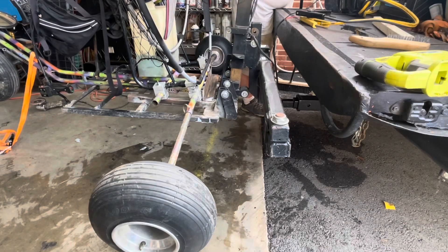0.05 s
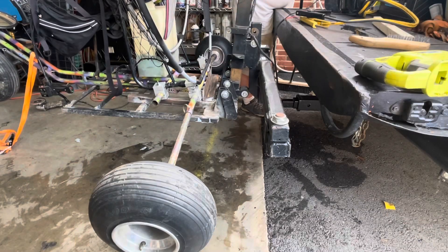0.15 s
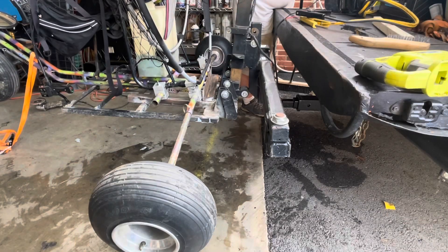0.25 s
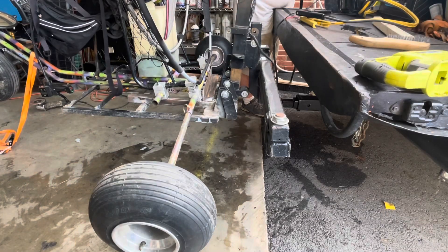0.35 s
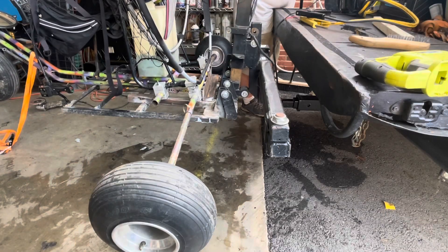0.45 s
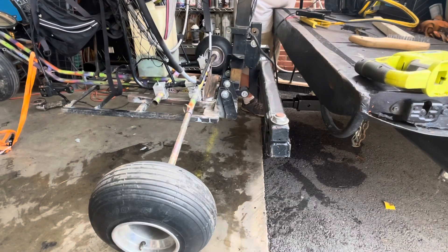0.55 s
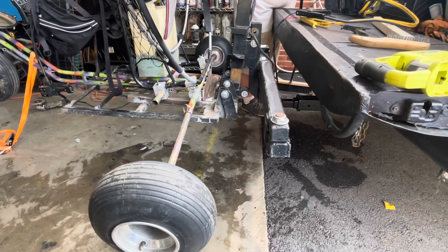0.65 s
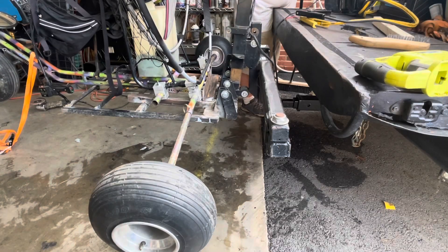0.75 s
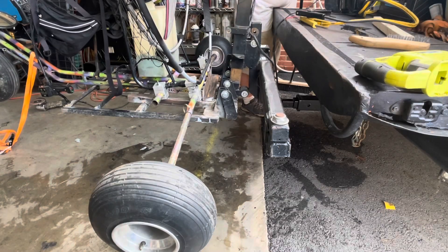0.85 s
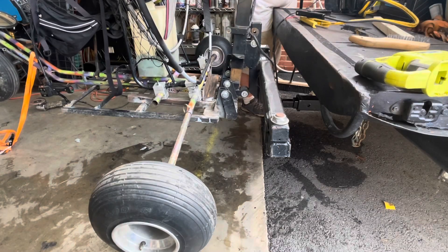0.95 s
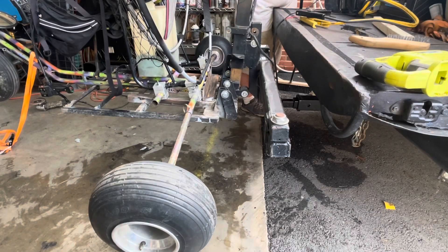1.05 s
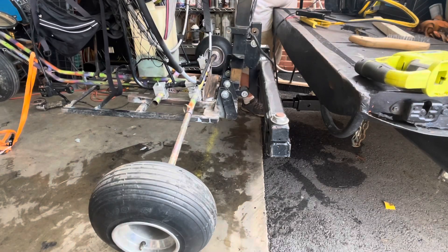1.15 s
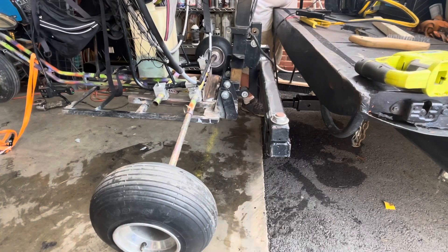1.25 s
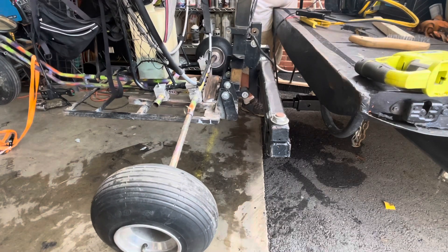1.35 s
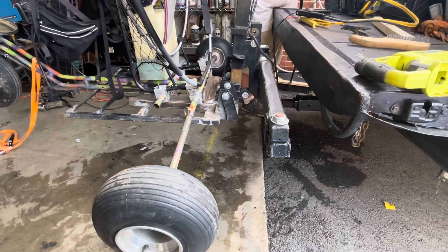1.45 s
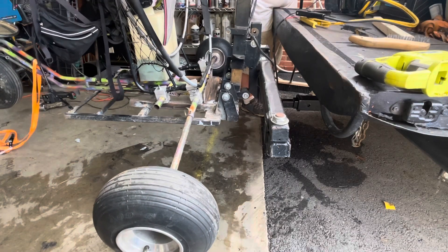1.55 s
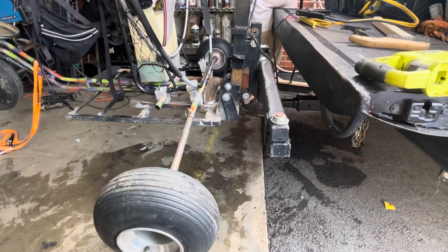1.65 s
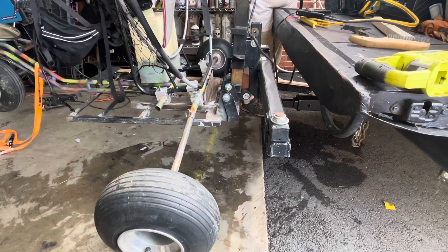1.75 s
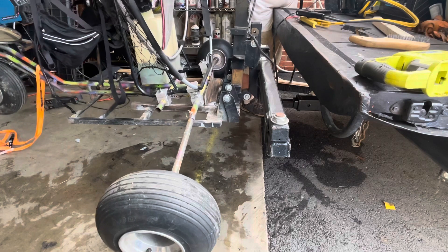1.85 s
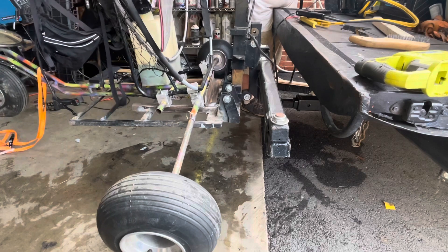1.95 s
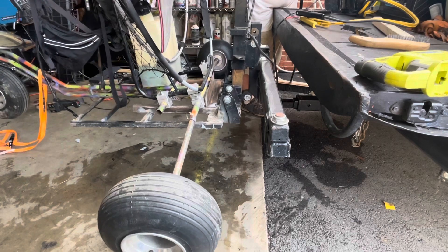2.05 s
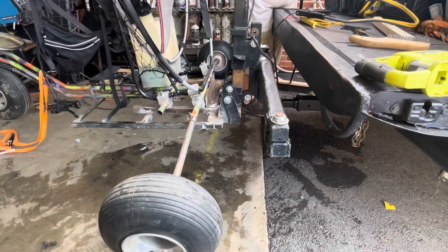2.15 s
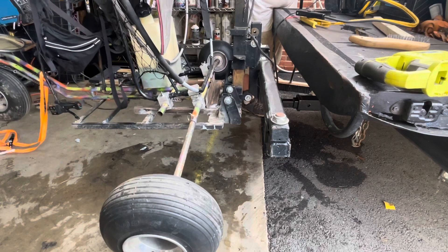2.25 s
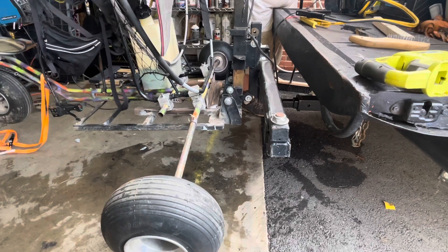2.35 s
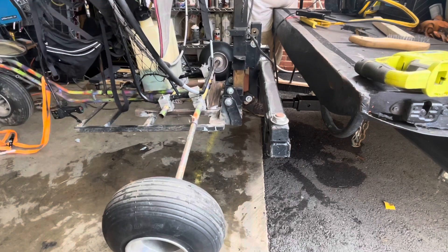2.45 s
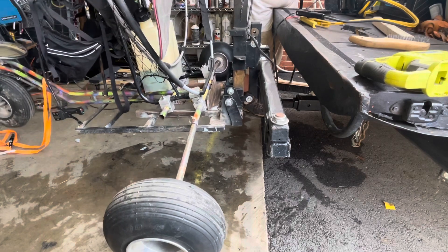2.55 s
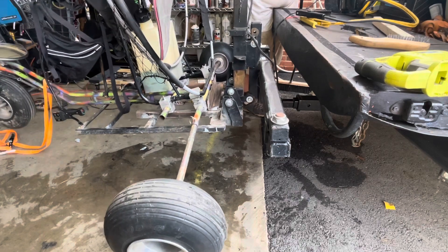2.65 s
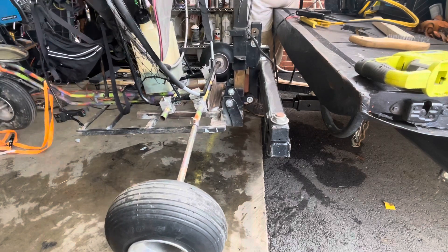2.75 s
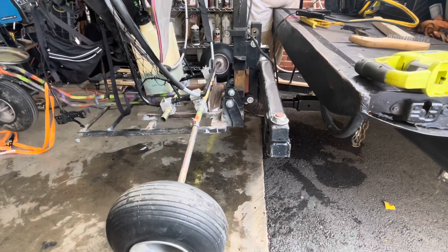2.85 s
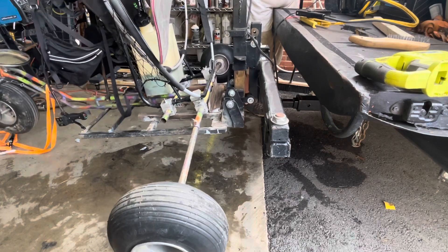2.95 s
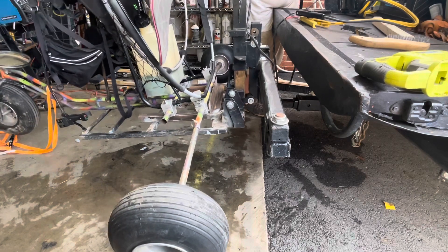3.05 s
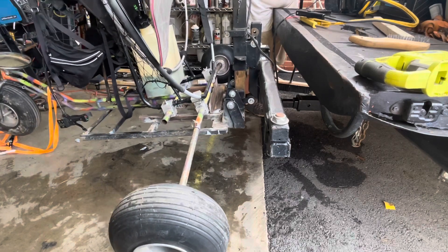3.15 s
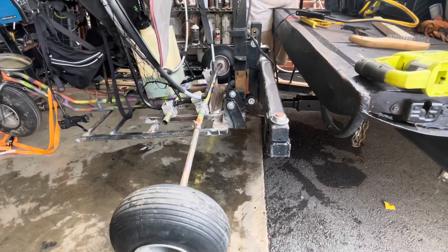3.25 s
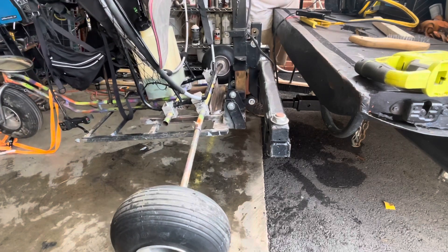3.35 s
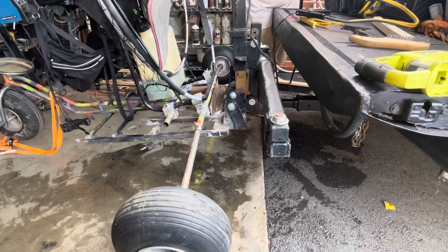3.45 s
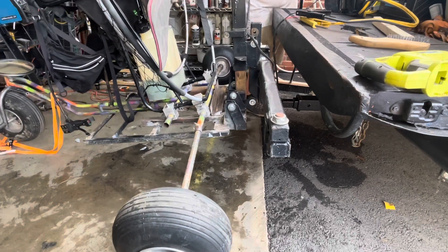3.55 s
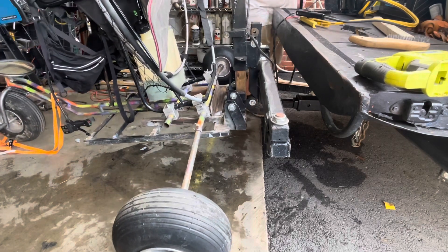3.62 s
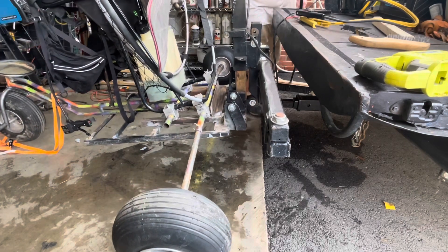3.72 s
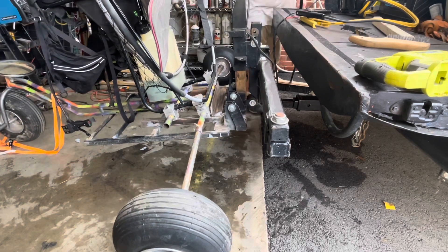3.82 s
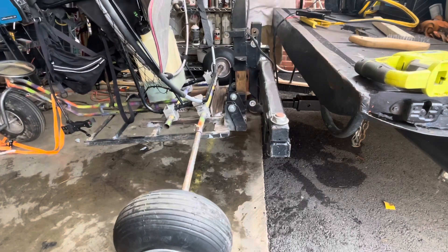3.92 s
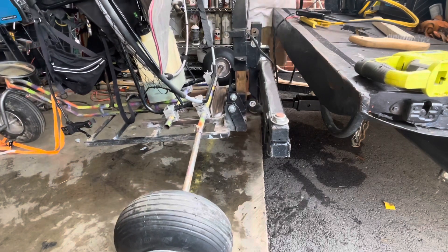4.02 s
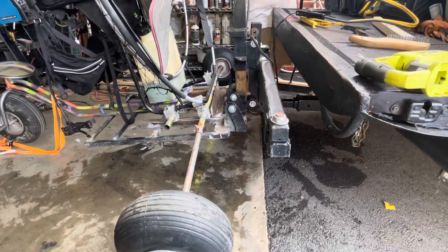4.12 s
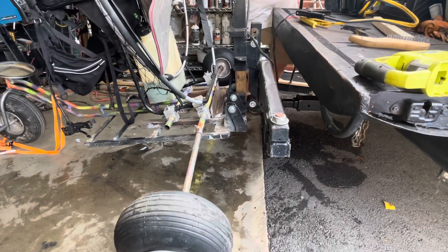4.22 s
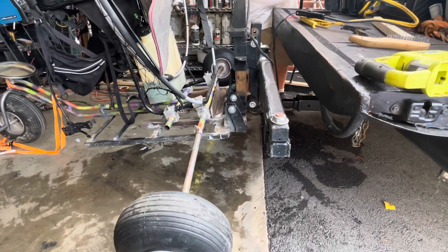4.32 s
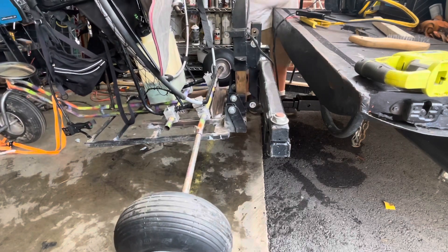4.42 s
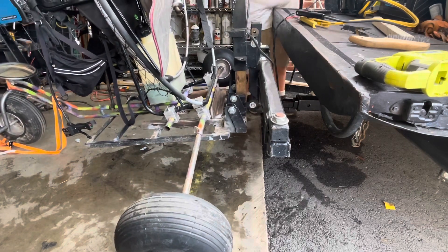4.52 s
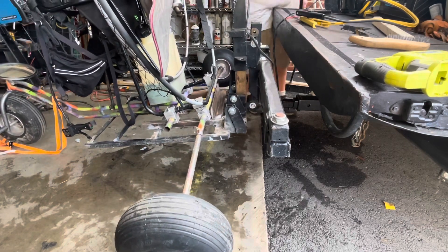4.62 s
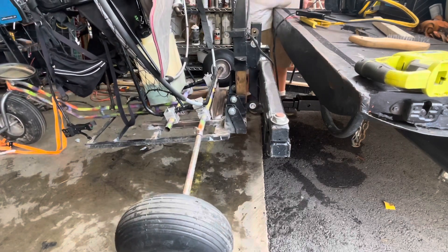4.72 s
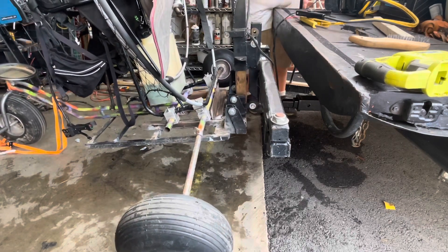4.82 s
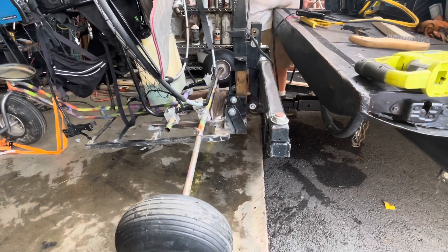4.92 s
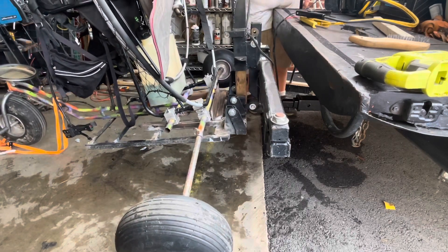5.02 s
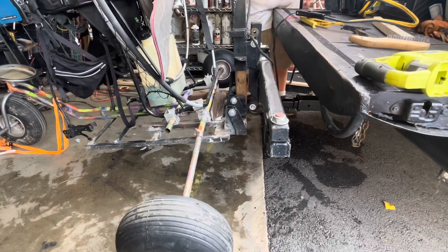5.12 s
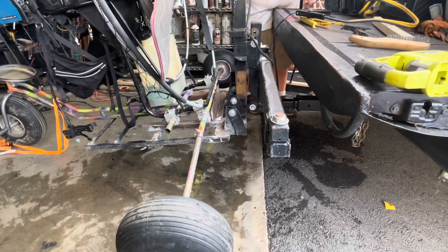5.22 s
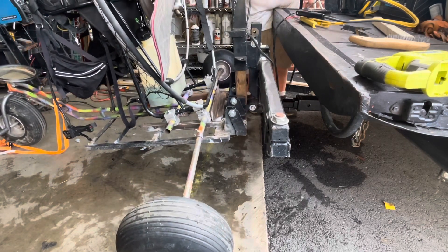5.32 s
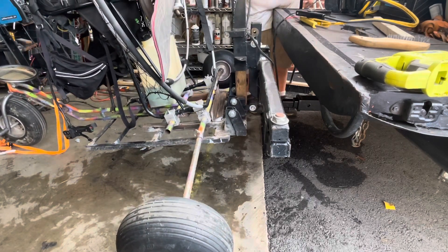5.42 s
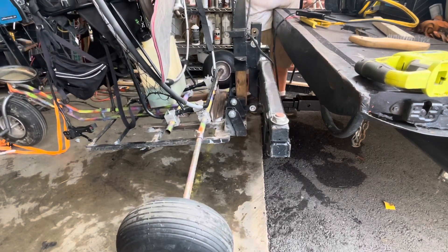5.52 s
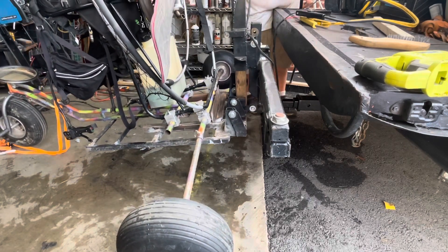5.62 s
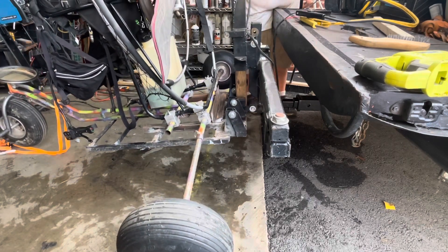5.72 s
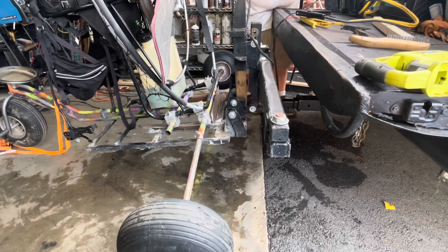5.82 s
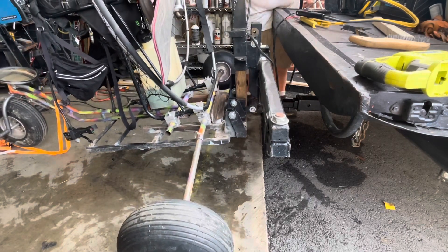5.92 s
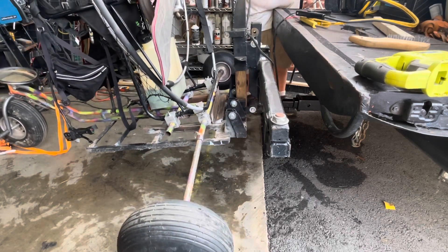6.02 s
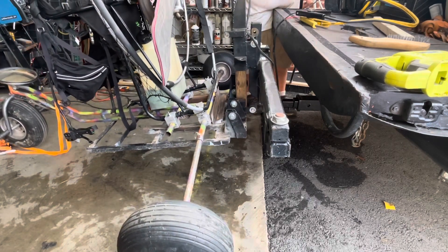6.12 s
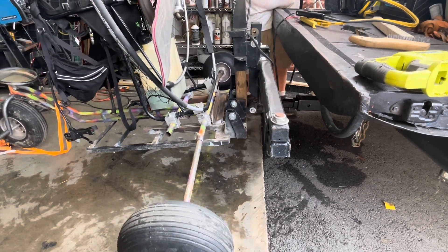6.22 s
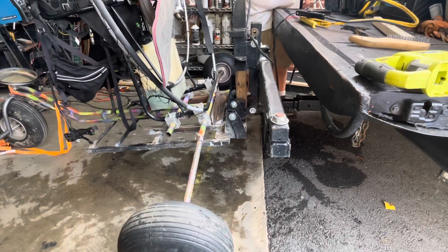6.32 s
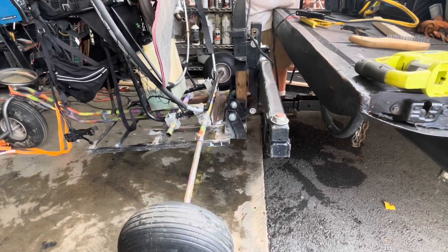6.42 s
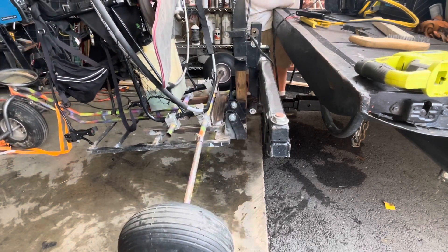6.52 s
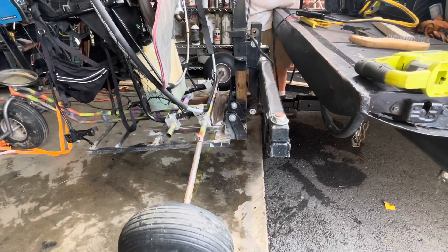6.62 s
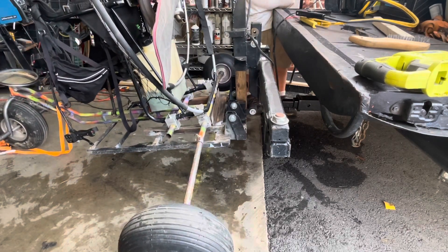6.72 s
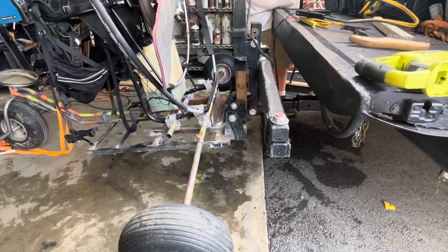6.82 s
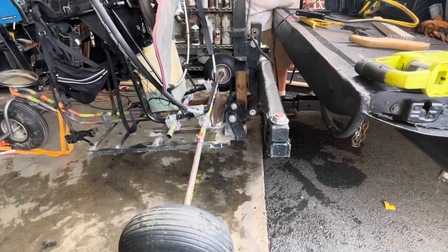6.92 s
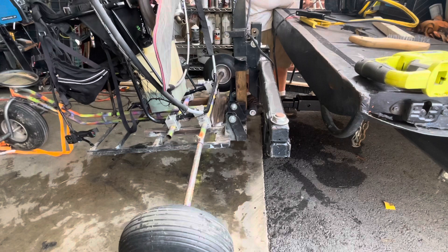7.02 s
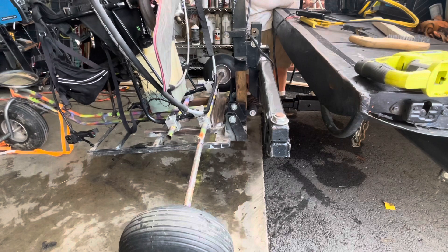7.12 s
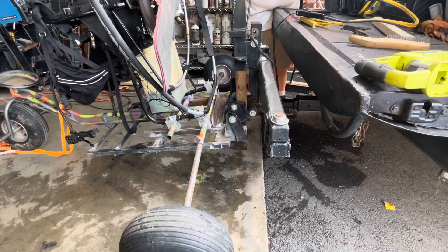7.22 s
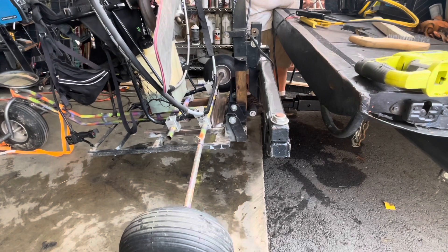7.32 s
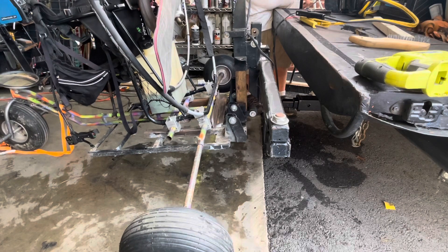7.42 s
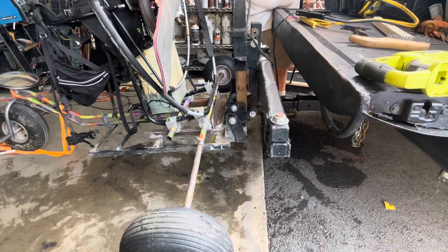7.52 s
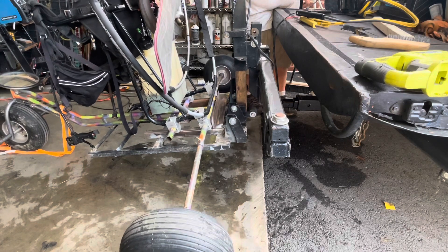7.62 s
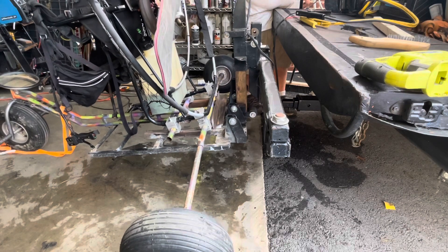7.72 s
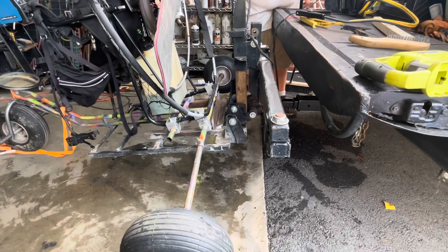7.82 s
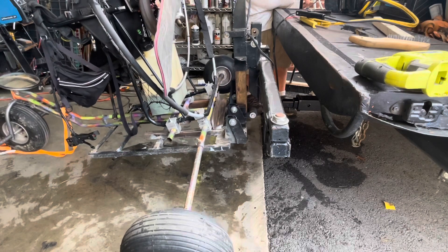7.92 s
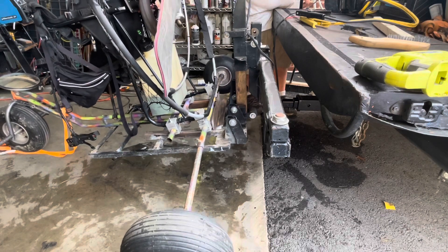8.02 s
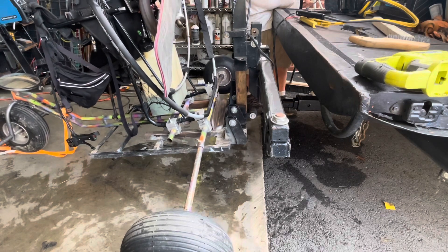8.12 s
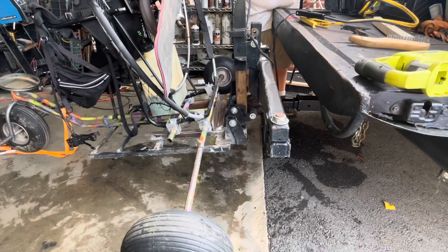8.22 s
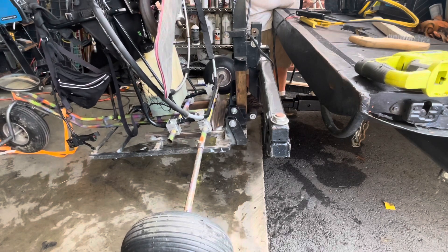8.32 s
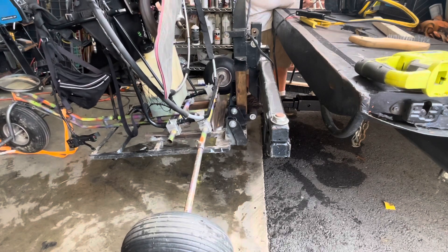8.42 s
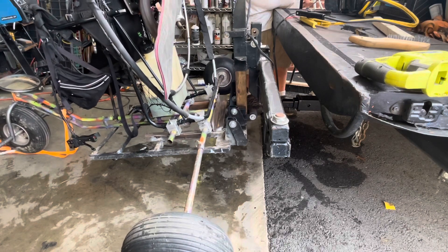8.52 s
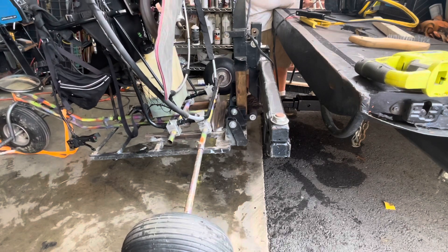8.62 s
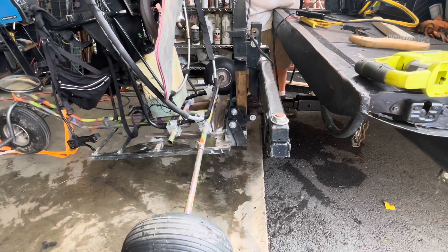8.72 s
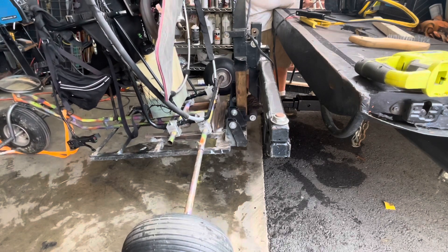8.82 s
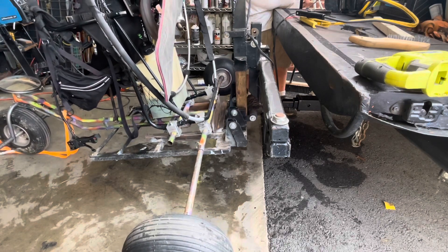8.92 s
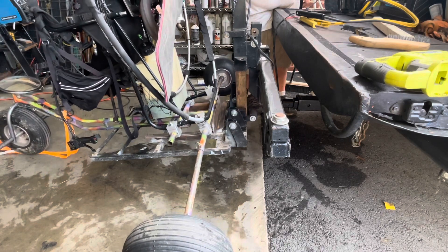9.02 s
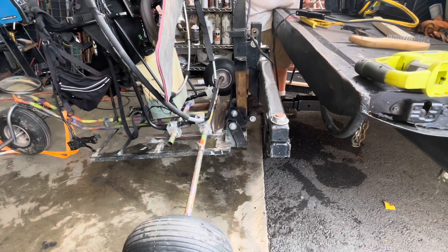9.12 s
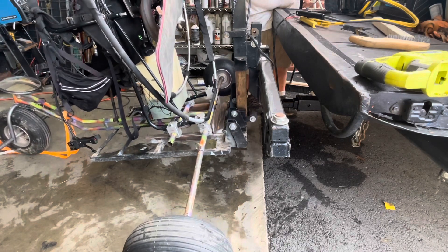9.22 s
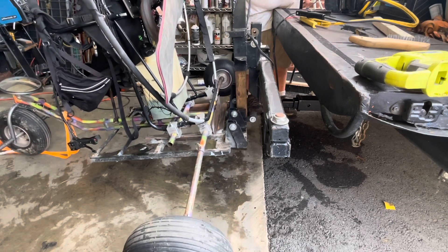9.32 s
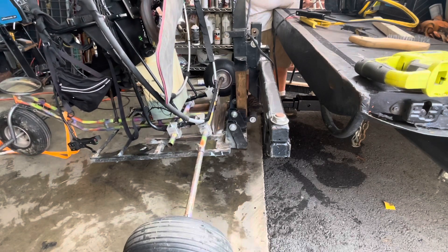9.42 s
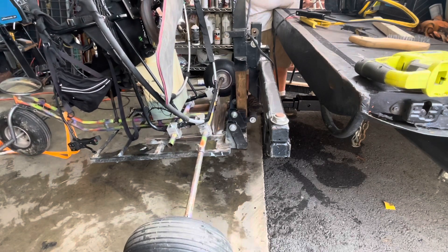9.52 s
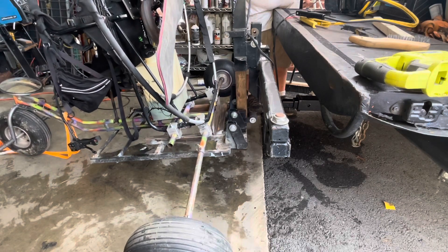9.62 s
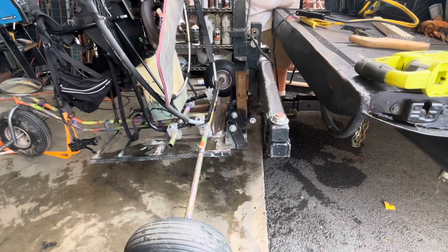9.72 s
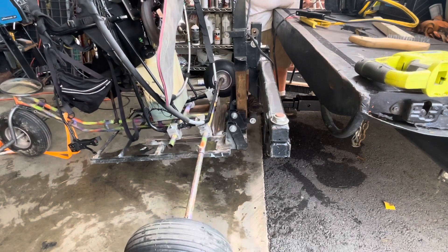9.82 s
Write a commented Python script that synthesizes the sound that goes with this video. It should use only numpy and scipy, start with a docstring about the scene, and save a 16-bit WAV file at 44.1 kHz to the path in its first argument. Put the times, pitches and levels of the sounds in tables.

```python
"""Garage air, narrow hums and an insect sound throughout as shaped noise; a rustle and a switch tick come first.
At 1.09 s a small geared electric motor starts with a clunk and clatter and whines on as it lowers a steel lift:
two strong tones of its 16 commutator bars and many weaker shaft orders are cosines of the shaft angle, over
brush hiss coloured by the housing. Struck modes make the clunk and, from 3.6 s, the frame's two quick judders;
from 4.5 s a single climbing tone is a distant engine."""
import sys
import numpy as np
from scipy import signal
from scipy.fft import rfft, irfft, next_fast_len
from scipy.io import wavfile

SR = 44100
rng = np.random.default_rng(int(sys.argv[2]) if len(sys.argv) > 2 else 0)


def to_wav(s):
    """Save 16-bit WAV."""
    ch = np.atleast_2d(s).T  # columns
    pcm = np.round(np.clip(ch, -1, 1) * 32767)  # PCM
    wavfile.write(sys.argv[1], SR, pcm.astype(np.int16))


N = 434826
T = np.arange(N) / SR
SLOW_T = np.arange(N // 441 + 2) / 100  # s, grid for slow changes
SIZE = next_fast_len(N + SR)
HZ = np.fft.rfftfreq(SIZE, 1 / SR)
START = 1.091  # s, the current comes on


def gain_of(db):
    """Decibel law: 20 dB is a factor of ten in amplitude."""
    return 10 ** (np.asarray(db) / 20)


def evened(x):
    """Normalization to unit rms."""
    return x / np.sqrt(np.mean(x ** 2) + 1e-20)


def read(points, hz):
    """Linear interpolation over logarithmic frequency."""
    f, value = np.transpose(points)
    return np.interp(np.log(hz + 1), np.log(f + 1), value)


def curve(rows, column=1):
    """Linear interpolation of one table column over time; the end values hold."""
    return np.interp(T, [r[0] for r in rows], [r[column] for r in rows])


def drift(rate, count):
    """Low-pass filtered chance: slow random rows of rms 1 on the slow grid, cut off at rate in Hz."""
    chance = rng.standard_normal((count, len(SLOW_T)))
    b, a = signal.butter(2, rate / 50)
    return evened(signal.lfilter(b, a, chance))


def peak(hz, width):
    """Resonance: a magnitude peak of 1, width in Hz between its half-amplitude points."""
    return 1 / (1 + (2 * (HZ - hz) / width) ** 2)


def stereo(x, other, colour, alike, tilt_db, lead=0):
    """Partial coherence: the right is a lagged mix of the left and an unrelated reflected part, then coloured."""
    left, unrelated = rfft(x, SIZE), rfft(other, SIZE)
    right = alike * left + np.sqrt(1 - alike ** 2) * unrelated
    right = right * np.exp(-1j * lead)
    tilt = gain_of(tilt_db / 2)
    return irfft(colour * np.array([left * tilt, right / tilt]), SIZE)[:, :N]


def ringing(modes):
    """Modal superposition: a struck body answers with a sum of exponentially decaying sines."""
    t = T[:SR // 2]
    return sum(gain_of(db - 60 * t / t60) * np.sin(2 * np.pi * hz * t) for hz, db, t60 in modes)


# Colour of the garage air. Each row: frequency in Hz, relative spectral level in dB per Hz.
AIR_COLOUR = [(15, -70), (34, -42), (44, -22), (59, 2), (88, -11.5), (109, -7), (158, -8.5), (237, -13),
              (293, -12.5), (344, -14), (427, -17.5), (978, -22.5), (5570, -73), (6720, -28), (7680, -47.5),
              (15000, -54)]
# Balance of the background. Each row: frequency in Hz, left minus right in dB.
AIR_TILT = [(60, -6), (130, -8.5), (290, -7.5), (640, 1), (1410, 2), (3100, 0), (6820, 2.5), (15000, 0.0)]
# Coherence of the background. Each row: frequency in Hz, left-right likeness from 0 to 1.
AIR_ALIKE = [(40, 0.99), (150, 0.94), (300, 0.7), (600, 0.032), (3000, 0.11)]
# Narrow bands of hum. Each row: frequency in Hz, width in Hz, level in dB.
HUMS = [(53.9, 1.3, -64), (58.2, 1.8, -63.5), (118.9, 1, -62.5), (193.7, 2.5, -65.5), (242.2, 3.3, -68),
        (339, 2.9, -68)]
# The insect's steady band. One row: frequency in Hz, width in Hz, level in dB.
INSECT = (6860, 100, -74.5)
# A faint rustle. Each row: time in seconds, level in dB.
RUSTLE = [(0, -78), (.2, -81), (.32, -68.5), (.45, -77), (.7, -75), (.8, -87), (1.09, -80)]
AIR_DB = -56.5
SWITCH_AT = 0.172  # s
TICK_TAIL_DB, TICK_TAIL_T60_S = -55.5, 0.21  # the walls return the tick


def air_noise(colour):
    """Diffuse field: noise whose left-right coherence depends on frequency."""
    left, other = rng.standard_normal((2, N))
    return stereo(left, other, colour, read(AIR_ALIKE, HZ), read(AIR_TILT, HZ))


def air_hums_and_insect():
    """Addition of powers: unrelated noise bands sum as squares to one spectrum."""
    power = (gain_of(AIR_DB) * evened(gain_of(read(AIR_COLOUR, HZ)))) ** 2
    for hz, width, db in HUMS + [INSECT]:
        power += (gain_of(db) * evened(peak(hz, width))) ** 2
    return air_noise(np.sqrt(power))


def rustle_and_echo():
    """Reverberant decay: band noise follows the rustle's level plus the tick's exponential tail."""
    band = (HZ > 1200) * (HZ < 9000)
    colour = (peak(2000, 1200) + 0.4 * peak(4500, 1500) + 0.1) * band
    tail = gain_of(TICK_TAIL_DB - 60 * abs(T - SWITCH_AT) / TICK_TAIL_T60_S) * (T > SWITCH_AT)
    return (gain_of(curve(RUSTLE)) + tail) * air_noise(evened(colour))


# A distant engine climbing in pitch.
# Each row: time in seconds, frequency in Hz, peak level in dB before the left-right balance.
ENGINE = [(4.5, 70, -86), (6., 78, -59), (6.6, 84, -64), (7.4, 94, -61), (8.3, 107, -52.5), (9., 112, -54),
          (9.4, 116, -61), (9.86, 126, -56)]


def distant_engine():
    """Frequency modulation: a single tone's phase is the running sum of its climbing frequency."""
    phase = 2 * np.pi * np.cumsum(curve(ENGINE)) / SR
    tone = gain_of(curve(ENGINE, 2)) * np.cos(phase)
    return tone * gain_of([[-3.5], [3.5]])  # stronger on the right


# Modes of the switch. Each row: frequency in Hz, relative level in dB, 60 dB decay time in seconds.
SWITCH_MODES = [(1770, -4, 0.11), (1808, -8, .2), (1870, -11, .06), (1990, -9, 0.06), (2080, -14, .06),
                (1790, -16, 0.45), (1850, -22, .35), (3580, -24, .07), (4150, -23, .07), (4425, -19, .09),
                (4750, -24, .06), (5265, -24, .06), (6600, -22, .03), (11000, -24, .012)]
# Phase of the nearby sources. Each row: frequency in Hz, radians by which the left leads.
LEAD = [(0, -3), (690, 2.5), (1640, 0.5), (3010, 3.5), (3450, 2.0), (4570, 8), (5680, 7.5), (6120, 10.5),
        (7670, 13.5), (8870, 18.5), (9300, 16), (12700, 13), (15700, 5.5)]
SWITCH_DB, SWITCH_RISE_S = -39.5, 0.0008


def switch():
    """Impulse excitation: one small tick rings the switch's modes after a very short rise."""
    tick = gain_of(SWITCH_DB) * ringing(SWITCH_MODES)
    tick *= np.minimum(T[:len(tick)] / SWITCH_RISE_S, 1)
    out = np.zeros(N)
    first = round(SWITCH_AT * SR)
    out[first:first + len(tick)] = tick
    delayed = np.roll(out, 90)  # about 2 ms later
    return stereo(out, delayed, colour=0.96, alike=0.99, tilt_db=-1.0, lead=read(LEAD, HZ))


# Blows as the drive takes up its slack; later the frame knocks.
# Each row: time in seconds, strength of the exciting impulse in dB.
BLOWS = [(1.0922, -40), (1.0939, -34), (1.097, -35), (1.1028, -29.5), (1.108, -36), (1.113, -37),
         (1.134, -34), (1.138, -33), (1.145, -38), (1.151, -38), (1.167, -39), (1.186, -41), (3.604, -47),
         (3.652, -44), (3.765, -45), (3.812, -43)]
# Modes of the steel frame. Each row: frequency in Hz, relative level in dB, 60 dB decay time in seconds.
FRAME_MODES = [(122, -19, 0.06), (400, -20, .07), (590, -19, 0.056), (887, -5, 0.06), (1162, -2, 0.022),
               (1315, -5, 0.049), (1460, -6, 0.058), (1680, -1, 0.042), (1930, 1.5, 0.035),
               (2300, -7, 0.021), (3400, -12, 0.006), (4300, -11, 0.007), (7070, -17, 0.022)]
# The frame judders twice. Each row: start in seconds, length in seconds, relative level in dB.
JUDDERS = [(3.6, 0.11, -2.5), (3.7, .15, 0.5)]
# Balance of the frame and the brushes. Each row: frequency in Hz, left minus right in dB.
TILT = [(60, 4), (92, 5), (140, -9), (210, -5), (330, -5.5), (500, -8.5), (770, 1.5), (1170, 8),
        (1790, -0.5), (2740, -9), (4190, 8), (6410, 0), (9810, 0.5), (15000, 0.5)]
JUDDER_DB, SCRAPE_DB, THUD_DB = -46.5, -46.5, -53  # before the judder's own level
CLATTER_DB, CLATTER_RISE_S, CLATTER_T60_S = -35.5, 0.006, 0.6  # loose parts rattle after the start


def judder_swell():
    """Amplitude envelope: a flattened half sine for each judder."""
    swell = np.zeros(N)
    for start, length, db in JUDDERS:
        progress = np.clip((T - start) / length, 0, 1)
        swell += gain_of(db) * abs(np.sin(np.pi * progress)) ** 0.56
    return swell


def struck_frame(swell, rattles_per_s=600, scatter=0.054, walls_t60_s=0.11, thin_hz=700):
    """Convolution: blows and random rattles excite near-wall echoes and the frame's modes."""
    force = np.zeros((2, N))
    for (start, db), sign in zip(BLOWS, rng.choice([-1., 1.], len(BLOWS))):
        force[:, round(start * SR)] = sign * gain_of(db)
    since = T - START
    clatter = gain_of(CLATTER_DB - 60 * since / CLATTER_T60_S) * np.clip(since / CLATTER_RISE_S, 0, 1)
    rattles = rng.laplace(0, 0.4, N) * (rng.random(N) < rattles_per_s / SR)
    force += (gain_of(JUDDER_DB) * swell + clatter) * rattles
    echoes = scatter * rng.standard_normal((2, 2600)) * gain_of(-60 * T[:2600] / walls_t60_s)
    echoes[:, 0] = 1  # direct sound
    echoed = signal.oaconvolve(force, echoes, axes=1)[:, :N]
    left, other = signal.oaconvolve(echoed, ringing(FRAME_MODES)[None], axes=1)[:, :N]
    high_pass = HZ / np.hypot(HZ, thin_hz)
    return stereo(left, other, high_pass, 0.86, read(TILT, HZ), read(LEAD, HZ))


def scrape_and_thud():
    """Filtered noise: a broad scrape and a low thud."""
    scrape = evened(stereo(*rng.standard_normal((2, N)), peak(600, 4500) * (HZ > 150), 1.0, 0))
    thud = evened(stereo(*rng.standard_normal((2, N)), peak(70, 60), 1.0, -5.0))
    return gain_of(SCRAPE_DB) * scrape + gain_of(THUD_DB) * thud


def frame():
    """Forced response: the struck steel frame, with scrape and thud while it judders."""
    swell = judder_swell()
    return struck_frame(swell) + swell * scrape_and_thud()


# Mean loaded shaft speed, creeping up as the lift travels. Each row: time in seconds, turns per second.
SPEED = [(1.3, 70.96), (1.42, 70.82), (1.52, 70.62), (1.85, 70.24), (2.15, 70.44), (2.38, 70.81),
         (2.58, 70.56), (2.8, 70.92), (3.12, 70.73), (3.27, 70.91), (3.5, 70.93), (3.64, 70.6),
         (3.86, 71.13), (4.15, 70.79), (4.42, 70.95), (4.75, 70.86), (5.1, 70.96), (5.42, 71.04),
         (5.7, 71.05), (6.2, 71.23), (6.55, 71.36), (6.9, 71.18), (7.1, 71.35), (7.2, 71.16), (7.36, 71.49),
         (7.5, 71.29), (7.65, 71.49), (8.0, 71.57), (8.4, 71.66), (9.0, 71.76), (9.4, 71.82), (9.86, 71.88)]
# Speed ripple at 1, 2 and 3 times per gear turn. Each row: depth in turns per second, lag in radians.
RIPPLE = [(0.164, 2.17), (0.131, -2.79), (0.059, 0.01)]
GEAR = 20  # shaft turns per turn of the driven gear
SPIN_UP_S = 0.035  # time constant
JITTER = 0.02  # random unevenness of the speed, turns per s


def shaft():
    """Exponential spin-up: integrated speed gives shaft and gear angle in turns, and share of full speed."""
    rise = 1 - np.exp(-np.maximum(T - START, 0) / SPIN_UP_S)
    gear = np.cumsum(curve(SPEED) * rise) / SR / GEAR
    uneven = JITTER * np.interp(T, SLOW_T, drift(12, count=1)[0])
    for k, (depth, lag) in enumerate(RIPPLE, 1):
        uneven += depth * np.cos(2 * np.pi * k * gear - lag)
    turns = GEAR * gear + np.cumsum(uneven * rise) / SR
    return turns, gear, rise


# Brush hiss. Each row: time in seconds, level in dB.
BRUSH = [(1.1, -33.5), (1.12, -41), (1.17, -38.5), (3.5, -38), (6.5, -38), (9.86, -37.5)]
# Broad colour of the housing. Each row: frequency in Hz, relative spectral level in dB per Hz.
HOUSING = [(200, -19), (600, -17), (900, -12.5), (1200, -16), (1700, -8.5), (2200, -6.5), (2600, -13),
           (2950, -19.5), (3250, -24), (4200, -27), (5500, -20.5), (7300, -20), (9400, -7.5),
           (12000, -22.5), (13500, -22), (15600, -39)]
# Resonances of the housing. Each row: frequency in Hz, width in Hz, relative level in dB.
HOUSING_RINGS = [(3440, 200, -16), (3900, 250, -19), (4540, 260, -18.5), (5200, 280, -20), (5630, 62, -14),
                 (6110, 410, -7.5), (6744, 380, -12.5), (6860, 100, -25), (8010, 320, -11),
                 (8860, 550, -14.5), (9980, 470, -0.5), (11230, 820, -9), (12240, 250, -12),
                 (12830, 350, -14)]
# Coherence of the hiss. Each row: frequency in Hz, left-right likeness from 0 to 1.
BRUSH_ALIKE = [(300, 0.58), (1000, 0.89), (2000, 0.46), (5000, 0.81), (9000, 0.74), (12000, 0.84),
               (14000, 1)]


def brushes(turns, repeat=0.05, per_turn=0.06, per_two=0.13, per_bar=0.35):
    """Friction noise: hiss pulsing with shaft and bars, partly repeating each turn, rings in the housing."""
    pattern = irfft(np.exp(2j * np.pi * rng.random((2, 230))), 8192)  # one turn of fixed roughness
    place = np.arange(8192) / 8192
    repeating = evened(np.array([np.interp(turns % 1, place, p) for p in pattern]))
    angle = 2 * np.pi * turns
    pulse = 1 + per_turn * np.cos(angle) + per_two * np.cos(2 * angle)
    pulse += per_bar * np.cos(16 * angle)  # 16 bars
    chance = evened(pulse * rng.standard_normal((2, N)))
    hiss = np.sqrt(repeat) * repeating + np.sqrt(1 - repeat) * chance
    hiss *= gain_of(curve(BRUSH)) * (T > START)
    power = gain_of(2 * read(HOUSING, HZ))
    for hz, width, db in HOUSING_RINGS:
        power += gain_of(2 * db) * peak(hz, width) ** 2
    colour = evened(np.sqrt(power))
    return stereo(*hiss, colour, read(BRUSH_ALIKE, HZ), read(TILT, HZ), read(LEAD, HZ))


# Weaker tones. Each entry: multiple of the shaft speed.
ORDERS = [4, 6, 8, 12, 14, 18, 19, 20, 21, 23, 24, 26, 28, 29, 30, 31, 33, 34, 36, 48, 49, 50, 55, 63, 64,
          66, 67, 75, 76, 78, 79, 80, 82, 95, 96, 97, 98, 108, 110, 112, 113, 122, 124, 125, 126, 128, 130,
          140, 141, 142, 143, 144, 146, 154, 155, 156, 157, 159, 160, 161, 174, 175, 176, 181]
# Four stages of the travel. Each entry: time in seconds.
STAGES = [2.1, 4.05, 6.35, 8.7]
# One row per order: left and right level in dB at each of the four stages in turn,
# then radians by which the left leads at each stage.
ORDER_LEVEL = [(-78, -60, -65, -61, -65, -63, -71, -65, -0.2, 0.1, -0.2, -1.2),
               (-88, -70, -85, -66, -79, -67, -75, -64, 1.6, 0.4, -0.3, -0.0),
               (-77, -65, -82, -63, -83, -65, -83, -64, 3.0, 2.6, 2.5, 2.6),
               (-61, -59, -57, -59, -59, -62, -57, -62, 2.5, 1.7, 2.1, 2.2),
               (-68, -62, -77, -77, -78, -71, -77, -65, 0.7, 1.4, 1.5, 1.1),
               (-68, -67, -68, -76, -63, -68, -61, -64, 0.3, 0.0, -0.0, 0.3),
               (-65, -64, -65, -63, -62, -59, -64, -63, 1.4, 1.3, 1.2, 2.0),
               (-59, -60, -65, -62, -61, -64, -61, -65, 0.7, 0.9, 0.9, 0.7),
               (-58, -61, -65, -62, -60, -61, -63, -60, 1.5, 0.6, 0.9, 0.9),
               (-63, -64, -63, -60, -65, -62, -62, -62, 1.4, 0.6, 0.8, 0.5),
               (-59, -54, -57, -55, -56, -52, -58, -53, 0.7, 0.4, 0.4, 1.0),
               (-67, -72, -61, -68, -62, -60, -70, -56, -0.3, 1.4, 1.6, 1.7),
               (-56, -52, -57, -58, -57, -57, -50, -56, 1.5, 4.3, 7.0, 7.2),
               (-61, -66, -62, -62, -66, -63, -66, -64, 2.2, 0.2, 0.1, 0.2),
               (-61, -58, -58, -56, -49, -47, -48, -44, 0.8, 0.8, 0.7, 0.6),
               (-59, -62, -62, -61, -61, -59, -51, -51, 0.6, 1.4, 1.7, 1.1),
               (-66, -65, -66, -71, -61, -60, -58, -57, 1.2, 0.3, -0.0, 0.9),
               (-67, -59, -61, -57, -61, -59, -48, -55, 1.5, 1.8, 2.9, 3.0),
               (-67, -69, -71, -76, -64, -62, -56, -56, -3.1, -2.4, -4.7, -4.8),
               (-57, -54, -57, -55, -59, -61, -54, -56, 2.4, 2.2, 2.0, 2.5),
               (-69, -71, -73, -74, -69, -67, -68, -76, 2.0, 2.5, 2.1, 2.5),
               (-67, -69, -65, -65, -62, -69, -66, -67, 2.1, 1.8, 1.0, 0.2),
               (-71, -65, -73, -68, -73, -71, -69, -75, 0.7, -0.8, -2.8, -1.3),
               (-82, -83, -70, -74, -67, -69, -63, -68, 0.3, -2.2, -1.0, -2.3),
               (-60, -59, -58, -60, -61, -62, -57, -59, -0.1, 2.9, 2.7, 1.8),
               (-66, -65, -66, -68, -69, -70, -65, -66, -2.2, 0.8, 0.6, 1.1),
               (-77, -75, -75, -76, -70, -69, -66, -73, -1.5, 0.3, 1.5, 1.9),
               (-72, -86, -73, -78, -66, -75, -64, -74, -2.7, 0.1, -2.3, -2.4),
               (-75, -80, -64, -76, -72, -72, -71, -78, 2.8, 2.7, 3.3, 3.6),
               (-66, -74, -67, -71, -72, -72, -71, -69, 0.2, 1.7, 3.1, 2.7),
               (-60, -77, -64, -67, -61, -69, -62, -70, -2.6, -2.0, -1.4, -4.2),
               (-50, -58, -52, -58, -53, -58, -53, -61, 1.3, 0.9, 1.2, 2.0),
               (-72, -75, -70, -72, -62, -64, -58, -64, -2.5, -3.2, -2.3, -1.8),
               (-62, -61, -64, -63, -64, -63, -71, -76, -0.7, -1.0, -1.2, -0.6),
               (-59, -55, -59, -54, -59, -52, -58, -56, -1.1, -1.4, -0.7, -0.1),
               (-66, -66, -64, -60, -65, -62, -63, -61, -0.3, -0.6, -0.4, -0.5),
               (-71, -69, -65, -63, -68, -67, -64, -63, 0.0, -0.7, -0.1, -0.5),
               (-64, -73, -67, -68, -63, -69, -65, -66, -0.8, -0.5, -0.4, -0.6),
               (-62, -66, -70, -72, -73, -68, -72, -63, -0.5, -0.4, -0.8, 0.4),
               (-59, -54, -58, -57, -55, -53, -57, -56, 2.4, 2.2, 1.8, 0.4),
               (-65, -62, -66, -62, -64, -63, -62, -63, 2.0, 3.6, 1.1, -0.2),
               (-68, -59, -69, -64, -73, -58, -66, -57, -2.1, -2.1, -2.2, -3.0),
               (-75, -62, -65, -56, -63, -56, -66, -54, 0.8, 1.7, -0.0, 1.6),
               (-67, -68, -66, -67, -67, -56, -63, -61, -2.5, -1.6, 0.5, 1.8),
               (-60, -54, -58, -53, -59, -56, -63, -53, -2.4, -0.1, -1.3, -3.7),
               (-49, -51, -53, -50, -53, -50, -56, -49, -2.0, -4.8, -3.6, -3.6),
               (-72, -73, -67, -64, -59, -61, -55, -53, -2.4, -3.4, -3.4, -3.2),
               (-53, -55, -50, -51, -52, -53, -55, -58, 2.2, 2.3, 2.3, 2.4),
               (-52, -53, -52, -54, -53, -55, -53, -56, 2.3, 2.4, 2.3, 2.3),
               (-53, -55, -52, -55, -56, -57, -55, -57, 2.5, 2.4, 2.3, 2.3),
               (-51, -53, -55, -57, -58, -58, -60, -61, 2.4, 2.4, 2.3, 2.5),
               (-44, -46, -54, -56, -53, -54, -53, -54, 2.4, 2.4, 2.4, 2.3),
               (-70, -72, -62, -62, -62, -63, -60, -62, 2.7, 2.5, 2.5, 2.3),
               (-63, -62, -60, -60, -61, -62, -65, -66, 2.5, 2.1, 2.0, 1.9),
               (-74, -69, -68, -69, -61, -62, -64, -64, 2.3, 2.1, 2.0, 1.8),
               (-61, -61, -60, -61, -63, -64, -66, -64, 2.0, 1.9, 1.9, 1.8),
               (-56, -59, -60, -62, -62, -62, -61, -61, 1.9, 1.8, 1.8, 1.7),
               (-63, -64, -60, -62, -64, -64, -64, -64, 1.6, 1.7, 1.7, 1.6),
               (-57, -57, -58, -58, -61, -62, -59, -60, 1.7, 1.7, 1.6, 1.6),
               (-68, -69, -61, -62, -63, -64, -61, -62, 1.5, 1.5, 1.5, 1.5),
               (-70, -71, -66, -66, -81, -81, -66, -66, 0.5, 0.6, 0.4, 0.2),
               (-66, -65, -66, -67, -68, -70, -81, -82, 0.3, 0.4, 0.3, 0.2),
               (-65, -64, -61, -61, -65, -66, -64, -65, 0.1, 0.3, 0.3, 0.2),
               (-75, -75, -68, -68, -69, -69, -75, -75, -0.0, 0.2, 0.1, 0.0)]
ORDER_ONSET = 4.5  # orders grow as this power of the share of full speed


def shaft_orders(turns, rise, waver_db=2.6, high_waver_db=1.7, steady_db=1.1, waver_rad=0.48):
    """Order series: cosines at multiples of the shaft angle, wavering in level and phase by slow chance."""
    out = np.zeros((2, N))
    for order, row in zip(ORDERS, ORDER_LEVEL):
        db, lead = row[:8], np.interp(SLOW_T, STAGES, row[8:])
        both, left, right, turn = drift(8.2, count=4)
        angle = 2 * np.pi * (order * turns + rng.random())
        lead = np.interp(T, SLOW_T, lead + waver_rad * turn)
        if order % 16 == 0:  # multiples of the bar count are steadier
            depth_db = steady_db
        else:
            depth_db = waver_db if order <= 36 else high_waver_db
        for side, own in enumerate((left, right)):
            waver = evened(gain_of(depth_db * (both + 0.77 * own)))
            level = gain_of(np.interp(SLOW_T, STAGES, db[side::2])) * waver
            out[side] += np.interp(T, SLOW_T, level) * np.cos(angle - side * lead)
    return np.sqrt(2) * out * rise ** ORDER_ONSET  # root two: levels are rms


# The bar tone and its octave. Each entry: multiple of the shaft speed.
BAR_TONES = [16, 32]
# Bar tone. Each row: time in seconds, left level in dB, cosine and sine share of its throb once per
# gear turn, cosine and sine share twice per gear turn, then the same five for the right.
BAR_LEVEL = [(1.3, -38.5, 0.28, 0.1, -0.21, 0.28, -43.1, 0.29, 0.13, -0.37, 0.16),
             (1.63, -41.5, -0.16, -0.1, -0.25, -0.24, -48.5, -0.23, -0.2, -0.18, -0.15),
             (1.96, -41, -0.16, 0.26, 0.03, -0.38, -44.5, 0.39, -0.07, 0.17, 0.13),
             (2.29, -39.5, 0.02, 0.21, -0.01, 0.03, -48.9, -0.35, 0.23, -0.1, 0.31),
             (2.62, -39.5, -0.27, -0.075, -0.032, -0.04, -46, 0.31, -0.18, 0.06, -0.24),
             (2.95, -40, 0.19, 0.068, -0.01, 0.061, -49, 0.07, 0.07, 0.1, 0.2),
             (3.28, -40, 0.23, -0.0, 0.036, -0.016, -48, 0.1, -0.12, 0.12, 0.07),
             (3.61, -44, 0.1, 0.098, -0.17, 0.087, -45, 0.2, -0.049, -0.29, -0.01),
             (3.94, -41.5, 0.02, -0.02, -0.0, -0.01, -41, -0.052, -0.095, 0.11, 0.06),
             (4.27, -40.5, -0.019, -0.32, -0.07, -0.031, -39, 0.2, -0.42, -0.09, -0.024),
             (4.6, -40.5, 0.19, -0.26, -0.21, 0.04, -39.5, 0.0033, -0.26, 0.07, 0.08),
             (4.93, -41.5, 0.089, -0.17, -0.14, -0.048, -39.5, 0.25, -0.25, 0.04, -0.11),
             (5.26, -41, 0.097, -0.35, -0.12, 0.062, -40.5, 0.055, -0.4, 0.023, 0.0045),
             (5.59, -43, 0.2, -0.31, -0.02, 0.004, -42.5, 0.29, -0.36, 0.13, 0.0013),
             (5.92, -40.5, 0.41, -0.13, -0.043, 0.1, -42, 0.27, -0.06, 0.069, -0.16),
             (6.25, -45, 0.18, -0.41, 0.11, 0.01, -45, -0.23, -0.19, 0.11, -0.19),
             (6.58, -45.5, 0.022, -0.03, 0.39, -0.12, -42.5, -0.25, 0.07, 0.067, -0.34),
             (6.91, -45.5, 0.17, -0.28, 0.05, 0.26, -44.5, -0.15, -0.23, 0.1, -0.15),
             (7.24, -44.5, -0.11, -0.42, 0.087, -0.2, -41.5, -0.28, 0.38, -0.14, -0.24),
             (7.57, -46.5, -0.54, -0.28, 0.13, -0.06, -42, -0.23, -0.085, 0.27, -0.19),
             (7.9, -44.5, -0.18, -0.06, 0.15, -0.12, -38.5, -0.06, -0.14, -0.032, -0.14),
             (8.23, -43, -0.17, -0.25, 0.08, 0.01, -38, -0.07, -0.12, 0.038, -0.02),
             (8.56, -44, -0.0095, -0.28, 0.04, 0.07, -38, -0.038, -0.22, 0.045, -0.054),
             (8.89, -43.5, 0.23, -0.33, 0.13, 0.1, -39, 0.1, -0.17, 0.097, 0.012),
             (9.22, -43.5, 0.24, -0.27, 0.03, 0.11, -39.5, 0.2, -0.25, 0.03, 0.13),
             (9.55, -44.5, 0.31, -0.29, 0.14, 0.16, -40.5, 0.27, -0.26, 0.07, 0.0081),
             (9.86, -44, 0.23, -0.07, 0.02, 0.07, -40.5, 0.13, -0.09, 0.05, 0.05)]
# Its octave. Each row: time in seconds, left level in dB, cosine and sine share of its throb once per
# gear turn, cosine and sine share twice per gear turn, then the same five for the right.
OCTAVE_LEVEL = [(1.3, -41.5, 0.28, 0.12, 0.16, 0.1, -41, 0.33, -0.047, 0.07, 0.08),
                (1.63, -39.5, 0.33, -0.05, 0.22, 0.24, -39.5, 0.22, -0.07, 0.21, 0.08),
                (1.96, -38.5, 0.27, -0.17, 0.21, 0.016, -40.4, -0.11, -0.09, 0.16, 0.16),
                (2.29, -42.5, 0.1, -0.26, -0.02, 0.05, -44.5, 0.05, 0.43, 0.34, -0.08),
                (2.62, -44, 0.36, -0.29, -0.0, 0.081, -48, -0.56, -0.32, -0.25, 0.24),
                (2.95, -41.5, 0.54, -0.13, 0.47, 0.27, -44, 0.28, 0.17, 0.63, 0.04),
                (3.28, -39.5, 0.4, -0.16, 0.28, -0.01, -41.3, -0.17, -0.06, 0.1, -0.09),
                (3.61, -44, -0.22, -0.08, 0.35, -0.052, -42, -0.16, 0.03, 0.46, -0.11),
                (3.94, -49.5, -0.083, -0.014, -0.14, 0.49, -44, -0.35, 0.077, -0.13, 0.46),
                (4.27, -46, -0.29, -0.27, -0.16, 0.51, -41.7, -0.27, -0.28, -0.3, 0.52),
                (4.6, -43.5, -0.17, -0.018, -0.13, 0.37, -40.5, -0.47, 0.12, -0.083, 0.28),
                (4.93, -41, 0.01, -0.09, 0.12, 0.45, -37.0, -0.34, 0.05, 0.085, 0.3),
                (5.26, -43.2, -0.1, 0.05, -0.34, 0.5, -37.0, -0.021, -0.08, -0.25, 0.38),
                (5.59, -38, 0.08, 0.11, -0.23, 0.28, -35.3, -0.13, 0.05, -0.19, 0.17),
                (5.92, -36.5, -0.036, -0.06, -0.16, 0.22, -32, -0.17, -0.06, -0.08, 0.1),
                (6.25, -36.7, 0.47, 0.06, 0.12, 0.01, -33.5, 0.14, 0.04, 0.14, 0.18),
                (6.58, -37, 0.28, 0.25, 0.38, -0.27, -33, 0.14, -0.07, 0.12, -0.17),
                (6.91, -36, 0.46, 0.028, 0.16, 0.26, -32, 0.19, -0.12, 0.16, 0.13),
                (7.24, -37.5, 0.23, -0.15, 0.38, -0.18, -33.1, 0.12, -0.17, 0.15, -0.042),
                (7.57, -40, -0.1, 0.25, 0.17, -0.47, -35.1, 0.021, -0.04, 0.3, -0.55),
                (7.9, -41.1, -0.062, 0.099, -0.44, -0.36, -36, -0.17, 0.14, 0.13, -0.33),
                (8.23, -38.5, 0.26, -0.13, -0.16, 0.04, -36.5, -0.11, 0.081, -0.1, -0.12),
                (8.56, -40, 0.43, -0.32, -0.12, -0.01, -38.5, 0.06, 0.12, 0.1, -0.11),
                (8.89, -41, 0.58, -0.29, -0.13, 0.01, -39.9, 0.15, -0.015, -0.073, -0.07),
                (9.22, -41, 0.71, -0.18, -0.31, -0.11, -41, -0.048, 0.1, -0.15, -0.38),
                (9.55, -43.5, 0.48, -0.25, -0.14, -0.09, -39, -0.073, -0.3, 0.00093, -0.48),
                (9.86, -42.0, 0.28, 0.03, -0.23, -0.27, -38.5, 0.46, -0.013, -0.23, -0.13)]
# Spinning up, the tones sweep across the frame's resonances.
# Each row: time in seconds, dB added to the bar tone, dB added to its octave.
SWEEP = [(1.095, -40, -30), (1.12, -25, -4.5), (1.137, 2, 6), (1.149, 7, -12), (1.157, 2, -3),
         (1.166, -9, -12), (1.185, 0, 1), (1.205, -6, -2), (1.225, -21, 3.5), (1.25, -3, 4),
         (1.283, -14, -1), (1.3, 1.5, 0)]
# As the lift travels the tones reach the two sides by other paths.
# Each row: time in seconds, radians by which the left leads for the bar tone, and for its octave.
BAR_LEAD = [(1.3, 1.4, -0.1), (1.64, 1.9, 0.035), (1.73, 2.8, 0.19), (1.8, 1.1, 0.22), (1.9, 3.5, .6),
            (2.03, 2.9, 0.94), (2.12, 2.3, -0.27), (2.8, 2, -0.21), (3.5, 2.13, -0.12), (3.9, 1.86, 1.3),
            (4.5, 2.13, 0.35), (5.7, 1.64, 0.85), (6.7, 0.8, 0.91), (7.5, 0.7, 0.48), (7.9, 1.18, 1.13),
            (9.86, 1.33, 1.1)]
# Exponent of the throb, for the bar tone and its octave, which dips more sharply.
THROB_POWER = [1.01, 1.12]
# Quick chance in level, in dB, for the bar tone and its octave.
FLUTTER_DB = [1.04, 1.9]


def bar_tones(turns, gear, flutter_rad=0.21):
    """Amplitude modulation: the commutator's two strong tones throb once and twice per gear turn."""
    out = np.zeros((2, N))
    beats = [f(2 * np.pi * k * gear) for k in (1, 2) for f in (np.cos, np.sin)]
    for n, (order, rows) in enumerate(zip(BAR_TONES, (BAR_LEVEL, OCTAVE_LEVEL))):
        left, right, turn = drift(16.7, count=3)
        lead = curve(BAR_LEAD, 1 + n) + np.interp(T, SLOW_T, flutter_rad * turn)
        for side, own in enumerate((left, right)):
            first = 1 + 5 * side  # this side's first column
            shares = sum(curve(rows, first + k) * beat for k, beat in enumerate(beats, 1))
            throb = 1 + (T > rows[0][0]) * shares
            db = curve(rows, first) + curve(SWEEP, 1 + n)
            db += np.interp(T, SLOW_T, FLUTTER_DB[n] * own)
            level = gain_of(db) * abs(throb) ** THROB_POWER[n]
            out[side] += level * np.cos(2 * np.pi * order * turns - side * lead)
    return np.sqrt(2) * out * (T > START)  # root two: levels are rms before the throb


def scene():
    """Linear superposition of all sources; one shaft angle drives tones and brushes."""
    turns, gear, rise = shaft()
    background = air_hums_and_insect() + rustle_and_echo() + distant_engine()
    motor = brushes(turns) + shaft_orders(turns, rise) + bar_tones(turns, gear)
    return background + switch() + frame() + motor


def record(dry):
    """Band limitation: a linear-phase low-pass filter ends the spectrum near 15.7 kHz."""
    low_pass = signal.firwin(511, 15700, window=("kaiser", 9), fs=SR)
    return signal.oaconvolve(dry, low_pass[None], "same")


dry = scene()
out = record(dry)
to_wav(out)
```